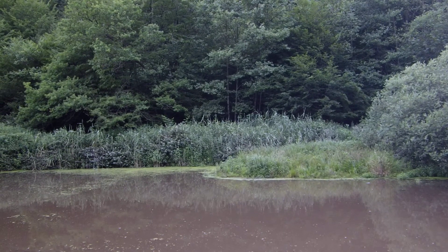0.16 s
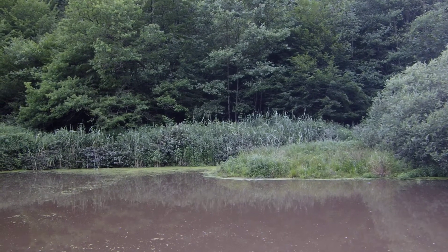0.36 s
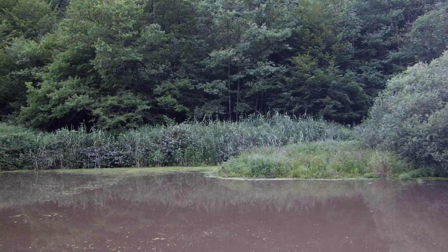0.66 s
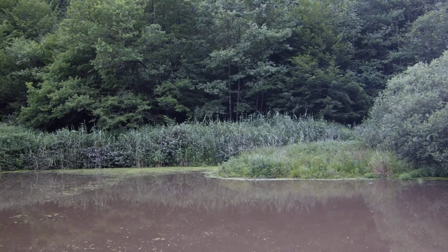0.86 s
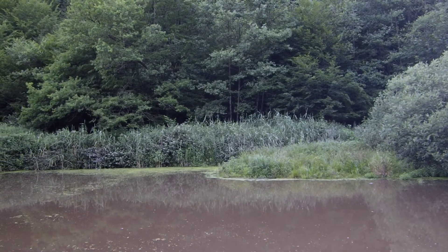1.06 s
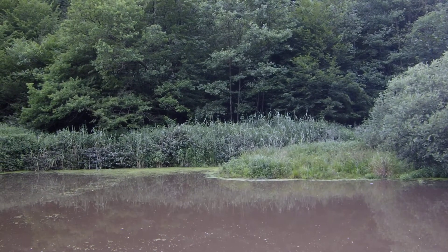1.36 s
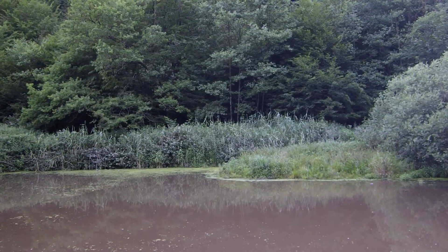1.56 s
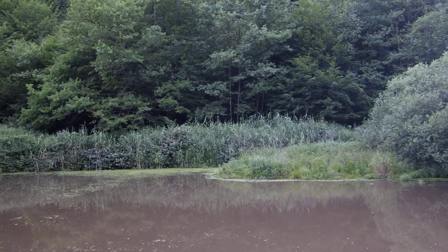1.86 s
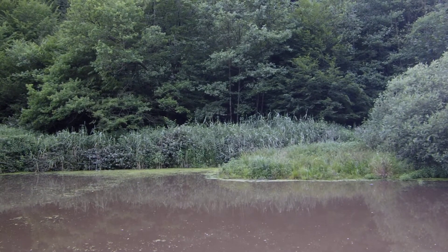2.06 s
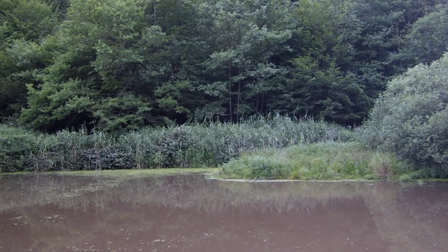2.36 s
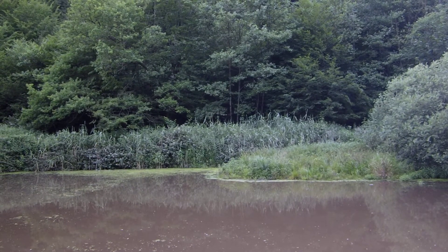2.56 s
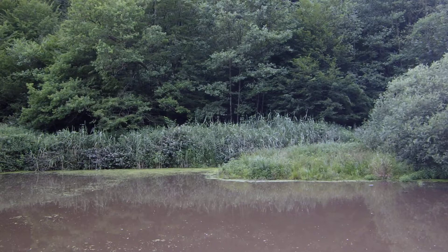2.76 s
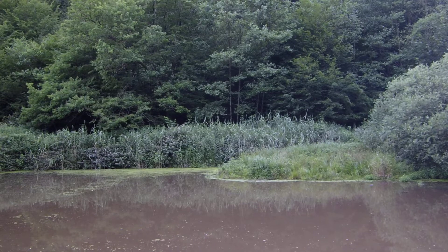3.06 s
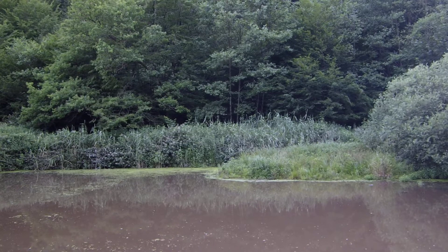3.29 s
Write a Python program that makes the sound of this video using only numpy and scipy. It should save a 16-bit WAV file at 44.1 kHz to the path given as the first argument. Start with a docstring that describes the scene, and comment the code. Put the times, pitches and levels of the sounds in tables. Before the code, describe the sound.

Steady, fast-pulsed insect buzz with a slight outdoor echo, heard over low rumble and faint hiss; dim bird twitters around one second, a light then a hard handling knock late, single-channel microphone.

```python
"""Mole cricket beside a pond

A mole cricket churrs from its burrow: fifty wing strokes a second, each a short run of file teeth ringing
the wing and burrow near 1.5 kHz, with scattered echo from reeds and trees. Far birds twitter faintly in gliding,
warbled tones over a patchy band of wider chorus. Shaped noise gives outdoor rumble and recorder hiss, with a
faint steady whine; two knocks ring the recorder body late on. Six notch filters cut the treble."""
import sys
import numpy as np
from scipy import signal
from scipy.fft import rfft, irfft
from scipy.io import wavfile
from scipy.ndimage import uniform_filter1d

SR = 44100
rng = np.random.default_rng(int(sys.argv[2]) if len(sys.argv) > 2 else 0)


def gain_from_db(level_db):
    """Convert decibel levels to linear amplitude factors (20 dB per decade)."""
    decades = np.asarray(level_db, float) / 20
    return 10 ** decades


def waveform_to_disk(signal):
    """Save audio, clipped to [-1, 1], as 16-bit WAV at the path in sys.argv[1]."""
    frames = np.transpose(np.atleast_2d(signal))
    scaled = np.clip(frames, -1, 1) * 32767
    samples = np.round(scaled).astype(np.int16)
    wavfile.write(sys.argv[1], SR, samples)


N = 151263  # samples, about 3.4 s


def level(x, db):
    """Scale to an rms level in dB."""
    return x * gain_from_db(db) / np.sqrt(np.mean(x ** 2))


def walk(rate):
    """Slow random curve of spread 1: noise averaged twice over 1/rate seconds."""
    k = int(SR / rate)
    w = uniform_filter1d(uniform_filter1d(rng.standard_normal(N), k), k)
    return w / w.std()


def add(out, t, x):
    """Mix x into out from time t in seconds."""
    i = int(t * SR)
    out[i:i + len(x)] += x[:max(len(out) - i, 0)]


def ramp(u):
    """Smooth rise from 0 to 1."""
    return np.sin(np.pi / 2 * np.clip(u, 0, 1)) ** 2


def scatter(x, db, t60):
    """Add a diffuse outdoor echo: decaying noise that falls 60 dB in t60 seconds."""
    tail = np.arange(SR // 3) / SR
    echo = rng.standard_normal(len(tail)) * gain_from_db(-60 * tail / t60) * ramp(tail / 0.01)
    echo = echo / np.sqrt(np.sum(echo ** 2))
    return x + gain_from_db(db) * signal.fftconvolve(x, echo)[:N]


def air():
    """Rumble, distant rustle and hiss: noise in third-octave bands, each flickering a little, plus a whine."""
    # colour of the background, density relative to the other rows: f/Hz, level/dB
    colour_points = [(20, -58), (60, -61.5), (150, -66), (300, -72), (500, -73), (750, -74), (1100, -73.5),
                     (1400, -72.5), (2100, -71), (2350, -85), (2900, -77), (3600, -74.5), (4300, -90.5),
                     (5000, -97.5), (6200, -90.5), (8000, -91.5), (10500, -88), (14500, -86),
                     (15300, -86.5), (15800, -104.5)]
    air_db, flicker_db = -48, .6
    whine_hz, whine_db = 9231, -84
    hz = np.maximum(np.fft.rfftfreq(N, 1 / SR), 1)
    point_hz, point_db = np.array(colour_points).T
    colour = gain_from_db(np.interp(np.log(hz), np.log(point_hz), point_db))
    spectrum = colour * rfft(rng.standard_normal(N))
    place = 3 * np.log2(np.clip(hz, 20, 20480) / 20)  # third-octaves above 20 Hz
    out = np.zeros(N)
    for k in range(31):
        share = np.clip(1 - np.abs(place - k), 0, 1)  # neighbouring bands crossfade
        out += gain_from_db(flicker_db * walk(5.1)) * irfft(spectrum * share, N)
    whine = gain_from_db(whine_db) * np.sin(2 * np.pi * whine_hz * np.arange(N) / SR)
    return level(out, air_db) + whine


def cricket():
    """Each stroke speeds up to the tooth rate, slows as it closes and stops; wing rings, reeds and trees echo."""
    # how late the strokes fall against a steady beat: t/s, lag/ms
    lag = [(0.02, 0.5), (0.14, 1.1), (0.28, -0.7), (0.4, 1.5), (0.5, -1.3), (0.52, -2.4), (0.66, -2.8),
           (0.82, -1.5), (0.92, -5.6), (1.18, -4.4), (1.28, -5.8), (1.34, -3.6), (1.46, -3.9), (1.48, -5.3),
           (1.5, -5.3), (1.8, -3.3), (1.98, -6.3), (2.02, -4.9), (2.36, -5.4), (2.51, -3.1), (2.67, -3.9),
           (2.78, -2.0), (2.91, 1.2), (3.03, -0.1), (3.09, 1.4), (3.39, 2.1)]
    first_stroke_s, stroke_period_ms = .0006, 20.05
    wander_ms, carry = .4, .3  # spread of the beat's wander; share carried to the next stroke
    attack_ms, hold_ms, release_ms = 1.6, 6.2, 2.4
    sag_db = -4  # level change over one hold time
    tooth_hz, pitch_scatter_hz = 1550, 5.4
    start_flat_hz, settle_ms, end_flat_hz = 119, 2.9, 37.8
    stroke_scatter_db, tooth_flutter_db = .5, 1.5
    wing_hz, wing_width_hz = 1500, 260
    churr_db, echo_db, echo_t60_s = -44, -11, .15

    beat = np.arange(first_stroke_s, N / SR, stroke_period_ms / 1000)
    timing, loudness, pitch = rng.standard_normal((len(beat), 3)).T
    wander = signal.lfilter([np.sqrt(1 - carry ** 2)], [1, -carry], timing) * wander_ms
    starts = beat + (np.interp(beat, *np.array(lag).T) + wander) / 1000

    t = np.arange(N) / SR
    stroke = np.clip(np.searchsorted(starts, t) - 1, 0, None)
    ms = np.maximum(t - starts[stroke], 0) * 1000  # time since the stroke began
    length_ms = attack_ms + hold_ms + release_ms
    shape = ramp(ms / attack_ms) * ramp((length_ms - ms) / release_ms)
    db = sag_db * ms / hold_ms + stroke_scatter_db * loudness[stroke] + tooth_flutter_db * walk(220)

    # phase in turns: steady tooth rate, less the flat start and the slowing close
    steady = (tooth_hz + pitch_scatter_hz * pitch[stroke]) * ms
    flat_start = start_flat_hz * settle_ms * (1 - np.exp(-ms / settle_ms))
    slow_close = end_flat_hz * hold_ms / 5 * (ms / hold_ms) ** 5
    turns = (steady - flat_start - slow_close) / 1000
    teeth = shape * gain_from_db(db) * np.sin(2 * np.pi * turns)
    wing = signal.iirpeak(wing_hz, wing_hz / wing_width_hz, SR)
    song = level(signal.lfilter(*wing, teeth), churr_db)
    return scatter(song, echo_db, echo_t60_s)


def birds():
    """Far phrases glide and warble in pitch and strength; trees smear them; a noise band stands for the chorus."""
    # wider chorus blurred into a band that thins out: t/s, level/dB
    chorus_levels = [(0, -60.5), (1.0, -60), (1.8, -62), (2.2, -66), (3.43, -65)]
    # warbled phrases: start t/s, length/s, start f/Hz, end f/Hz, level/dB before warble
    phrases = [(0.752, .07, 3600, 3700, -59), (0.872, .06, 3600, 3400, -57.5),
               (.935, 0.056, 3600, 3450, -56), (1.005, 0.056, 3350, 3510, -59),
               (1.08, 0.051, 3650, 3470, -58), (.858, 0.018, 4400, 4370, -72),
               (.945, .015, 2900, 2680, -58), (1.44, .04, 3600, 3360, -61), (1.51, 0.04, 3450, 3700, -61),
               (1.469, .07, 2900, 2750, -59), (1.64, .04, 3750, 3600, -59), (1.674, 0.021, 2900, 2850, -56),
               (1.7, 0.11, 2900, 2800, -61)]
    warble_rate, warble_hz, warble_db = 220, 170, 5  # per second, then spreads of pitch and level
    trees_db, trees_t60_s = 2, .2
    chorus_band_hz, patchy_db = [2600, 4000], 1.8

    out, wobble, throb = np.zeros(N), walk(warble_rate), walk(warble_rate)
    for start, length, hz0, hz1, db in phrases:
        u = np.linspace(0, 1, int(length * SR))
        i = int(start * SR) + np.arange(len(u))
        hz = hz0 + (hz1 - hz0) * u + warble_hz * wobble[i]
        shape = ramp(u / 0.1) * ramp((1 - u) / 0.28) * gain_from_db(db + warble_db * throb[i])
        add(out, start, shape * np.sin(2 * np.pi * np.cumsum(hz) / SR))

    band = signal.butter(2, chorus_band_hz, "bandpass", fs=SR, output="sos")
    chorus = level(signal.sosfilt(band, rng.standard_normal(N)), 0)
    chorus_db = np.interp(np.arange(N) / SR, *np.array(chorus_levels).T) + patchy_db * walk(35)
    return scatter(out, trees_db, trees_t60_s) + gain_from_db(chorus_db) * chorus


def knocks():
    """A short push rings the body modes and a bright snap marks the contact; the hard knock bounces once."""
    # contacts: t/s, level/dB, brightness/(dB per octave about 1 kHz), thump/dB against level, tick level/dB
    contacts = [(2.6258, -28.5, -5.5, -20, -42.5), (2.784, -15, 2.6, 1.7, -34.5),
                (2.7860, -30.5, -1.7, -1, -56)]
    # ringing modes of the recorder body: f/Hz, level/dB against the contact, t60/s
    body = [(87.5, -12.5, 0.027), (228, -22, 0.036), (385, -16, 0.044), (542, -10, 0.021),
            (750, -14, 0.032), (930, -15.5, 0.024), (1308, -5.5, 0.024), (1843, -1.5, 0.011),
            (2058, -5.5, 0.02), (2850, -30, .015), (3600, -2.5, 0.018), (4400, 2.3, 0.0092),
            (6740, -12, 0.0086)]
    thump_hz, tick_hz = 300, 3000  # modes below are the thump, modes above the tick
    contact_ms = .45
    snap_db, snap_t60_s = -8, .005  # snap gain against the tick

    out, t = np.zeros(N), np.arange(SR // 8) / SR
    for start, db, tilt_db, thump_db, tick_db in contacts:
        ring = np.zeros(len(t))
        for k, (hz, mode_db, t60) in enumerate(body):
            if hz > tick_hz:
                push_db = tick_db
            elif hz < thump_hz:
                push_db = db + thump_db
            else:
                push_db = db + tilt_db * np.log2(hz / 1000)
            decay = gain_from_db(mode_db + push_db - 60 * t / t60)
            ring += (-1) ** k * decay * np.sin(2 * np.pi * hz * t)  # modes alternate in sign
        ring *= ramp(t * 1000 / contact_ms)
        bright_noise = np.diff(rng.standard_normal(len(t) + 1))
        snap = bright_noise * gain_from_db(tick_db + snap_db - 60 * t / snap_t60_s)
        add(out, start, ring + snap)
    return out


def scene():
    """Pond-side air, cricket, far birds and knocks, on one channel."""
    return (air() + cricket() + birds() + knocks())[None]


def band_limit(x):
    """A steep low-pass at the top of the band."""
    return signal.sosfilt(signal.butter(12, 16410, fs=SR, output="sos"), x)


def record(dry):
    """A steep top cut, then notch filters in the treble."""
    # notch filters: f/Hz, width/Hz
    notches = [(3187, 620), (4080, 390), (5125, 360), (5674, 330), (7127, 680), (8183, 50)]
    top_cut = signal.ellip(12, .5, 70, 15760, fs=SR, output="sos")  # ripple dB, stopband dB, edge Hz
    mix = signal.sosfilt(top_cut, dry)
    for hz, width_hz in notches:
        mix = signal.lfilter(*signal.iirnotch(hz, hz / width_hz, SR), mix)
    return band_limit(mix)


dry = scene()
out = record(dry)
waveform_to_disk(out)
```